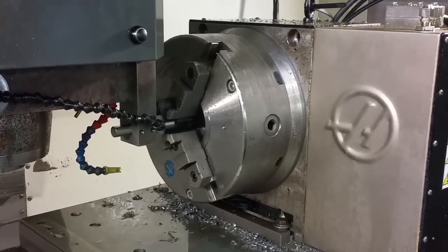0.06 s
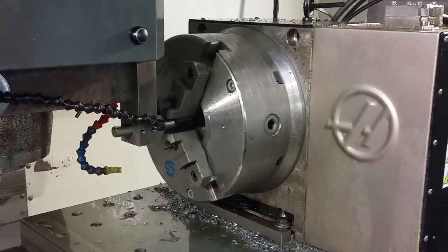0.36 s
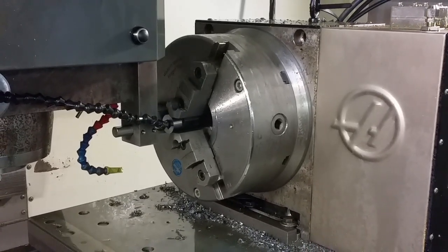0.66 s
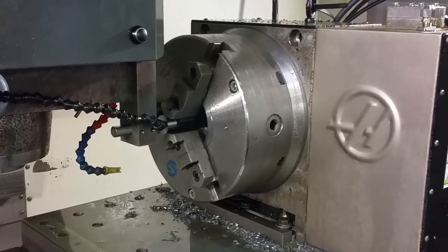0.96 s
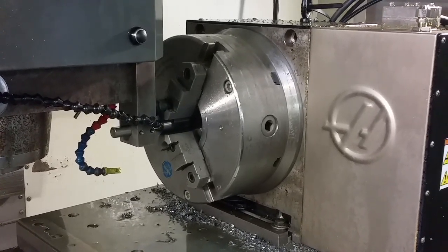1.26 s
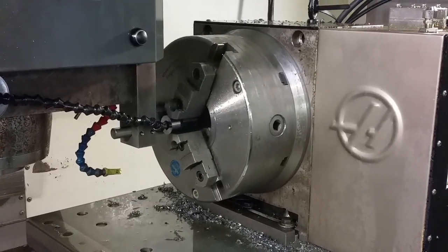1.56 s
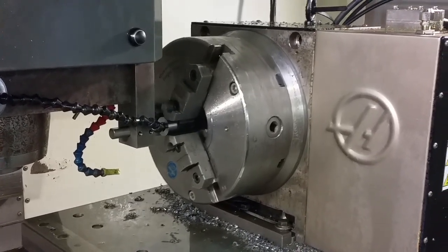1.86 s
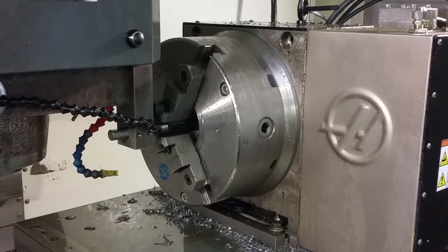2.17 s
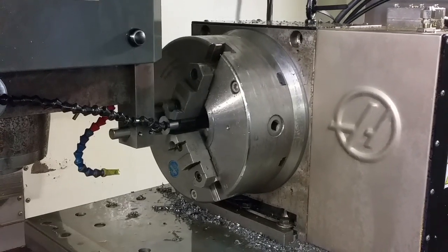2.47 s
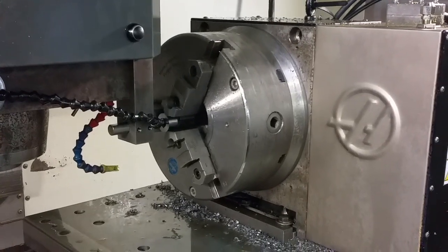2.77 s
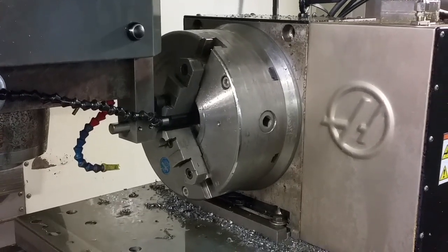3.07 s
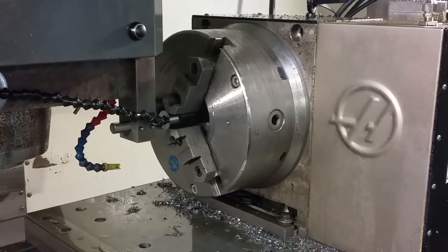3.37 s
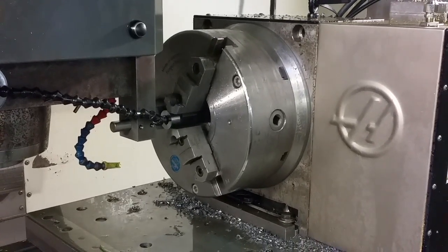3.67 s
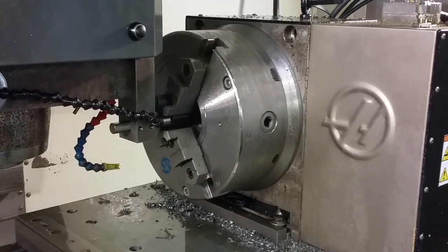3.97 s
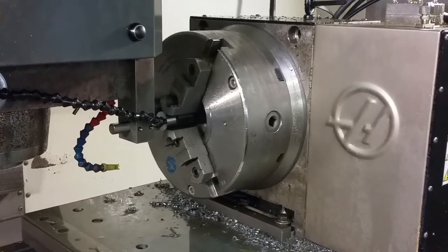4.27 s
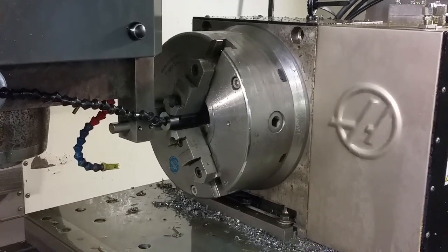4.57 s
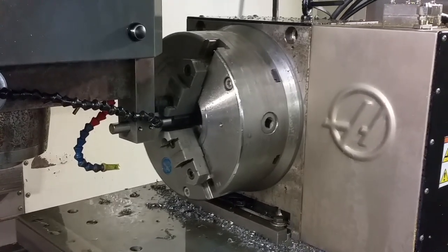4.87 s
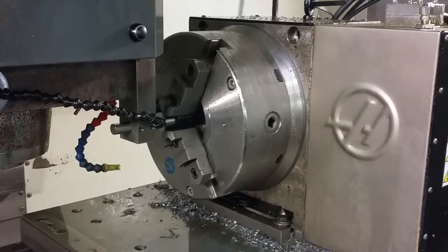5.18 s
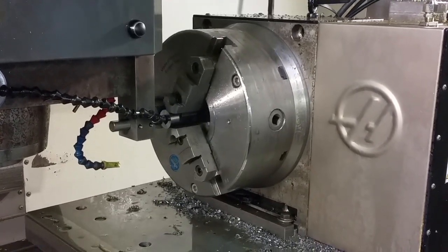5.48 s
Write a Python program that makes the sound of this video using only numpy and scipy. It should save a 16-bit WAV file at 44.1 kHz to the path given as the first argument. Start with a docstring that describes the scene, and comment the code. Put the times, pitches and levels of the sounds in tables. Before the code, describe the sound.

A coolant nozzle hisses loudly and without pause inside the metal enclosure of a machining center, over machine noise and a thin, high whine. About once a second, as the tool strokes into a metal bore, the hiss brightens slightly, whistles faintly, and gusts knock on the right side of the microphone. Late on, a faint low tone slides down once.

```python
"""A coolant nozzle hisses at the tool of a machining center, over machine noise and a thin steady whine.
The tool shapes a keyway, about one stroke a second. On each stroke the turbulent jet whistles across the
rim of the bore, brightens as it blows inside, and glances off the chuck, so that gusts knock on the
right microphone port. Resonances of the sheet-metal enclosure colour the hiss.
Late on, a faint low tone slides down once."""
import sys
import numpy as np
from scipy import signal
from scipy.fft import rfft, irfft, next_fast_len
from scipy.io import wavfile
from scipy.ndimage import uniform_filter1d

SR = 44100
rng = np.random.default_rng(int(sys.argv[2]) if len(sys.argv) > 2 else 0)


def dump(signal):
    """Clip the signal to [-1, 1] and save it as 16-bit WAV at the path in sys.argv[1]."""
    limited = np.clip(np.atleast_2d(signal).T, -1, 1)
    pcm = np.round(limited * 32767).astype(np.int16)
    wavfile.write(sys.argv[1], SR, pcm)


N = 253134

# Steady machine noise. Each row: frequency in Hz, left and right relative spectral density in dB.
MACHINE_NOISE = [(25, -85, -86), (50, -80, -89), (100, -81, -77), (196, -78.4, -76), (360, -74.5, -70.5),
                 (626, -72, -69)]
# The free jet at each port. Each row: frequency in Hz, relative spectral density in dB.
FREE_JET_LEFT = [(1000.0, -65.4), (1800.0, -60.9), (2700.0, -59.8), (3800.0, -57.6), (4350.0, -54.8),
                 (5000.0, -58.5), (6000.0, -57.7), (6400.0, -67.6), (7300.0, -66.9), (9000.0, -66.8),
                 (11000.0, -68.7), (12000.0, -66.7), (12500.0, -65.0), (15600.0, -66.9)]
FREE_JET_RIGHT = [(1000.0, -64.0), (1800.0, -58.5), (2450.0, -51.8), (2780.0, -51.2), (3100.0, -47.5),
                  (4400.0, -54.0), (6000.0, -50.6), (6350.0, -52.7), (7200.0, -50.6), (8450.0, -65.6),
                  (9200.0, -57.4), (11900.0, -59.3), (12900.0, -64.7), (15600.0, -69.8)]
# Enclosure modes and nozzle whistles. Each row: centre in Hz, width in Hz, left and right gain in dB.
RESONANCES = [(258, 30, 3.6, 0.2), (415, 30, 7.6, 5.4), (781, 62, 8.8, 5.8), (921, 30, 1.2, 3.9),
              (991, 60, 0.9, 3.5), (1141, 40, 3.8, 4.2), (1211, 30, 4.0, 0.9), (1340, 30, 4.9, 2.3),
              (1540, 30, 5.5, 2.3), (1583, 30, -7.7, -1.0), (1943, 30, 0.8, 3.5), (2126, 14, 5.0, 8.2),
              (2261, 30, 4.5, 7.0), (2336, 60, 1.7, 3.4), (2487, 30, 4.2, 2.0), (2616, 60, -0.3, 3.6),
              (2649, 24, 0, 3), (2885, 30, 1.9, 4.7), (2982, 36, 0, 7), (3090, 24, 1, 2.5),
              (3295, 130, 4.1, 0.1), (3391, 60, 0.2, 3.3), (3516, 20, 0, 3), (3677, 30, 0, 3.5),
              (4054, 30, 3.8, 3.7), (5663, 20, 6, 2), (6248, 20, 1, 4), (6794, 20, 2.5, 9),
              (7929, 22, 5, 15.5), (7950, 380, 0, 2.5)]
# Coherence of the noise at the two ports. Each row: frequency in Hz, coherence from 0 to 1.
PORT_COHERENCE = [(40, .3), (200, .4), (500, .45), (900, .55), (1500, .3), (2200, .3), (4000, .2),
                  (8000, .15), (15000, .18)]
# Phase between the ports. Each row: frequency in Hz, lead of the left port in radians.
PORT_PHASE = [(100, -1), (900, 0.4), (1400, 0.65), (2000, 0.9), (2800, 0.4), (3400, -2.5), (4200, -3),
              (6000, -3), (11000, -5.5), (15000, -2)]
# Response of the bore to the whole jet. Each row: frequency in Hz, left and right gain in dB.
BORE_RESPONSE = [(700.0, 0, 0), (2400.0, 0, -1.5), (3220, -0.5, 0.3), (4400, 1.2, 0.0), (5470, 3, 1.2),
                 (6360, 6, 6), (6770, 5, 0.5), (7300, 2, -1), (8500.0, 2.5, -3), (9600.0, -3.5, 2.5),
                 (10800.0, 7, 2.5), (11800.0, -1, 3), (12800.0, -2, -0.5), (15500.0, 0, -1)]
# Strength of the jet. Each row: time in seconds, gain in dB.
JET_STRENGTH = [(0.0, -1.5), (0.3, 0.45), (0.6, 0.2), (1.05, 0.3), (1.4, -0.5), (2.05, 0.64), (2.9, -1.24),
                (3.25, 0.9), (3.55, -0.64), (3.98, 1.25), (4.5, -0.66), (5.05, 0.8), (5.74, -0.2)]
# Bands in which the hiss swells. Each row: frequency in Hz, shares of roar, rasp and fizz from 0 to 1.
SWELL_BANDS = [(400, 0, 0, 0), (900, 0.39, 0.11, 0), (1670, 1, 0.49, 0.89), (2210, 0.057, 0.15, 0),
               (2570, 0, 1, 0), (3280, 0.042, 0.41, 0), (8400, 0, 0, 0.098), (9200, 0, 0.25, 0.57),
               (12000, 0.097, 0.21, 1), (13000, 0, 0, 0.49)]
# The hardest gusts on the port. Each row: start in seconds, relative thump and crack levels in dB.
HARD_GUSTS = [(0.278, -37, -36), (0.318, -30, -27), (0.407, -26, -32), (0.417, -21, -24.5),
              (0.443, -31, -30), (0.485, -29, -35), (0.574, -30, -34), (1.12, -28, -30), (1.312, -30, -25),
              (1.401, -40, -27), (1.628, -34, -37), (2.189, -40, -35), (2.304, -29, -28), (2.335, -31, -31),
              (2.362, -31, -27.5), (2.485, -29, -30), (3.176, -32, -29), (3.289, -30, -23.5),
              (3.324, -26, -24.5), (3.418, -35, -32), (4.15, -32, -30), (4.192, -34, -29),
              (4.231, -31, -26), (4.247, -30, -29), (4.476, -35, -42), (5.093, -30, -29), (5.185, -37, -29)]
# Glide of the low tone. Each row: time in seconds, frequency in Hz, relative level in dB.
MOAN_GLIDE = [(4.15, 463, -76), (4.26, 459.6, -39), (4.32, 441, -46), (4.37, 406, -42), (4.44, 407, -47),
              (4.54, 410, -61)]

FRAME, HOP = 2048, 256  # samples
DEEPEST_S, STROKE_S = .375, 0.96  # the tool's first deepest point, and its period
RIM_AT, RIM_WIDTH, CHOKE_AT = 0.65, 0.17, 0.68  # places where the tool crosses the rim, blocks the bore
SPRAY_AT, SPRAY_WIDTH = .62, .04  # place where the jet meets the chuck
SPRAY_ABOVE_HZ, OFF_CHUCK, ON_CHUCK = 8500, .25, .95  # the spray's band; its shares of the bore's gain
WHISTLE_HZ, WHISTLE_WIDTH_HZ, OFF_RIM_DB, RIM_RISE_DB = 3070, 150, -2.5, 3
DIP_AFTER_S, DIP_HALF_S, DIP_DB = .215, .045, -1.3  # treble dip, timed from each deepest point
GUST_LEAD_S, FLUTTER, FLUTTER_HALF_S = .005, .33, .003  # a gust's lead-in and its turbulence


def travel(t):
    """Uniform reciprocation is a triangle wave: the tool's place runs from 0, drawn back, to 1, in."""
    return abs(2 * ((t - DEEPEST_S) / STROKE_S % 1) - 1)


def in_bore(place, stray_share=.17):
    """The jet couples to the bore: the share that enters grows with the depth of the tool."""
    return np.interp(place, [.42, .82], [stray_share, 1])


def gain_of(db):
    """Amplitude grows tenfold for every 20 dB."""
    return 10 ** (np.asarray(db) / 20)


def unit_rms(x):
    """Normalisation to unit mean power."""
    return x / np.sqrt(np.mean(x ** 2) + 1e-20)


def curve(rows, t):
    """Linear interpolation of each column of a time table."""
    s, *columns = np.transpose(rows)
    return np.array([np.interp(t, s, c) for c in columns])


def spectrum(rows, hz):
    """Interpolation of each column of a frequency table on a logarithmic axis."""
    f, *columns = np.transpose(rows)
    return np.array([np.interp(np.log(hz + 1), np.log(f + 1), c) for c in columns])


def resonance(hz, centre, width):
    """A damped resonator has a Lorentzian peak, here of height 1."""
    return 1 / (1 + (2 * (hz - centre) / width) ** 2)


def wander(t, slowest_hz=0.77, fastest_hz=4):
    """Slow sinusoids in random phase superpose into an irregular drift of rms 1."""
    rates = np.geomspace(slowest_hz, fastest_hz, 20)
    cycles = np.outer(t, rates) + rng.random(len(rates))
    return unit_rms(np.sin(2 * np.pi * cycles).sum(1))


def steady_rush(gain_db=0.4, ripple_db=2.0):
    """Broadband noise of jet and machine, filtered by resonances, reaches the ports partly coherent."""
    size = next_fast_len(N)
    hz = np.fft.rfftfreq(size, 1 / SR)
    left, independent = rfft(rng.standard_normal((2, size))) * np.sqrt(SR / 2)
    coherence = spectrum(PORT_COHERENCE, hz)[0]
    lag = np.exp(-1j * spectrum(PORT_PHASE, hz)[0])
    right = coherence * left * lag + np.sqrt(1 - coherence ** 2) * independent
    left_rows = [(f, db) for f, db, _ in MACHINE_NOISE] + list(FREE_JET_LEFT)
    right_rows = [(f, db) for f, _, db in MACHINE_NOISE] + list(FREE_JET_RIGHT)
    colour_db = np.vstack([spectrum(left_rows, hz), spectrum(right_rows, hz)]) + gain_db
    for centre, width, left_db, right_db in RESONANCES:
        colour_db += np.outer([left_db, right_db], resonance(hz, centre, width) ** 2)
    # higher up, the enclosure's modes crowd into a fine random ripple
    ripple = unit_rms(uniform_filter1d(rng.standard_normal((2, len(hz))), size=130, axis=1))
    colour_db += ripple_db * ripple * np.clip(hz / 3000, 0, 1) ** 2
    return irfft(np.array([left, right]) * gain_of(colour_db), size)[:, :N]


def stroke_colour_db(hz, t):
    """The moving tool makes a time-varying filter: the jet whistles at the rim, brightens in the bore."""
    place = travel(t)
    treble = hz[:, None] > SPRAY_ABOVE_HZ
    spraying = np.interp(place, [SPRAY_AT - SPRAY_WIDTH, SPRAY_AT + SPRAY_WIDTH], [OFF_CHUCK, ON_CHUCK])
    colour_db = spectrum(BORE_RESPONSE, hz)[:, :, None] * np.where(treble, spraying, in_bore(place))
    # the treble dips briefly as the tool leaves the bore
    from_dip_s = (1 - travel(t - DIP_AFTER_S)) * STROKE_S / 2
    colour_db += DIP_DB * treble * np.exp(-(from_dip_s / DIP_HALF_S) ** 2)
    on_rim = np.exp(-((place - RIM_AT) / RIM_WIDTH) ** 2)
    choked = np.interp(place, [CHOKE_AT, 1], [0, 1])
    roar_db = -1.5 + on_rim - 0.13 * wander(t)
    rasp_db = -1.2 - 2 * choked + 0.55 * wander(t)
    fizz_db = -0.27 + 0.44 * wander(t, slowest_hz=2.5, fastest_hz=9)
    colour_db += spectrum(SWELL_BANDS, hz).T @ np.array([roar_db, rasp_db, fizz_db])
    whistle_db = OFF_RIM_DB + RIM_RISE_DB * on_rim
    return colour_db + np.outer(resonance(hz, WHISTLE_HZ, WHISTLE_WIDTH_HZ), whistle_db)


def coolant_hiss(patchy_db=0.49, sputter_db=0.11):
    """Stroke and jet strength modulate the turbulent noise; spray adds a random flicker."""
    hz, t, rush = signal.stft(steady_rush(), SR, nperseg=FRAME, noverlap=FRAME - HOP)
    gain_db = stroke_colour_db(hz, t) + curve(JET_STRENGTH, t)[0]
    patches = uniform_filter1d(rng.standard_normal(rush.shape), size=24, axis=1)  # across frequency
    patches = uniform_filter1d(patches, size=20, axis=2)  # across time
    gain_db += patchy_db * unit_rms(patches)
    _, hiss = signal.istft(rush * gain_of(gain_db), SR, nperseg=FRAME, noverlap=FRAME - HOP)
    sputter = unit_rms(uniform_filter1d(rng.standard_normal(N), size=900))
    return hiss[:, :N] * gain_of(sputter_db * sputter)


def whine(hz=7928, left_db=-47, right_db=-36.0, drift_hz=1.95):
    """Slight frequency modulation makes a thin, steady tone drift in pitch."""
    t = np.arange(N) / SR
    frame_s = t[::HOP]
    pitch = hz + drift_hz * np.interp(t, frame_s, wander(frame_s))
    tone = np.sqrt(2) * np.sin(2 * np.pi * np.cumsum(pitch) / SR)
    return gain_of([[left_db], [right_db]]) * tone


def gust(thump_db, crack_db, thump_hz=170, deep_hz=55, crack_hz=300, top_hz=1080):
    """An eddy on the port is a pressure step: a fluttering crack, then a thump as it swings back."""
    t = np.arange(FRAME) / SR - GUST_LEAD_S
    jf = 1j * np.fft.rfftfreq(FRAME, 1 / SR)
    onset = np.exp(-2 * np.pi * jf * GUST_LEAD_S)
    churn = rfft(FLUTTER * rng.standard_normal(FRAME) * np.exp(-(t / FLUTTER_HALF_S) ** 2))
    thump_highpass = jf / (jf + deep_hz) * jf / (jf + deep_hz / 2)
    thump_lowpass = 1 / (1 + np.sqrt(2) * jf / thump_hz + (jf / thump_hz) ** 2)
    thump = unit_rms(irfft(onset * thump_highpass * thump_lowpass))
    crack_highpass = jf / (jf + crack_hz)
    crack_lowpass = 1 / (1 + jf / top_hz) / (1 + jf / top_hz + (jf / top_hz) ** 2)
    crack = unit_rms(irfft((onset + churn) * crack_highpass * crack_lowpass))
    knock = gain_of(thump_db) * thump + gain_of(crack_db) * crack
    return knock * np.sqrt(.01 * SR / FRAME)  # levels count as rms over 10 ms


def add(mix, s, sound):
    """Superposition: a sound joins the mix from s seconds on."""
    part = mix[max(round(s * SR), 0):][:len(sound)]
    part += sound[:len(part)]


def knocks(thump_gain_db=-0.6, crack_gain_db=1.4, spread_db=2.0, most_per_s=80, leak_db=-24):
    """The deflected jet sheds eddies on the right port: hard gusts, and a flurry growing with depth."""
    port = np.zeros(N)
    for s, thump_db, crack_db in HARD_GUSTS:
        add(port, s - GUST_LEAD_S, gust(thump_db + thump_gain_db, crack_db + crack_gain_db))
    candidates = 800
    for when, chance, size in rng.random((candidates, 3)):
        s = when * N / SR
        extra_db = -spread_db * np.log(max(size, .1))
        eddy = gust(thump_db=-43 + extra_db, crack_db=-39 + extra_db)
        share = in_bore(travel(s))
        if chance * candidates * SR / N < most_per_s * share:
            add(port, s, share * eddy)
    return port * np.array([[gain_of(leak_db)], [1]])


def moan(gain_db=-0.5, blur_hz=20):
    """A far tone slides down, smeared by the workshop: random phase modulation broadens its line."""
    t = np.arange(N) / SR
    hz, tone_db = curve(MOAN_GLIDE, t)
    lowpass = signal.butter(2, blur_hz, fs=SR, output="sos")
    waver = unit_rms(signal.sosfilt(lowpass, rng.standard_normal((2, N))))
    tone = np.sqrt(2) * np.sin(2 * np.pi * np.cumsum(hz) / SR + waver)
    sounding = (t > MOAN_GLIDE[0][0]) & (t < MOAN_GLIDE[-1][0])
    return tone * gain_of(gain_db + tone_db) * sounding


def scene():
    """The pressures of the four sources add linearly at each port."""
    return coolant_hiss() + whine() + knocks() + moan()


def record(dry, knee=.62, headroom=.33, edge_hz=15780):
    """Soft saturation rounds the tallest peaks; a steep low-pass filter then limits the band."""
    excess = np.maximum(abs(dry) - knee, 0)
    rounded = np.clip(dry, -knee, knee) + np.sign(dry) * headroom * np.tanh(excess / headroom)
    lowpass = signal.firwin(1023, edge_hz, window=("kaiser", 9), fs=SR)
    return signal.oaconvolve(rounded, lowpass[None], "same")


dry = scene()
out = record(dry)
dump(out)
```